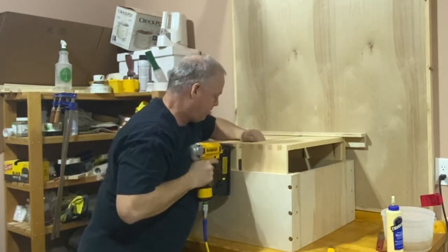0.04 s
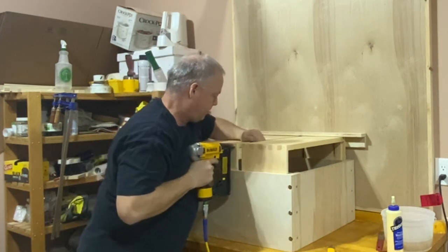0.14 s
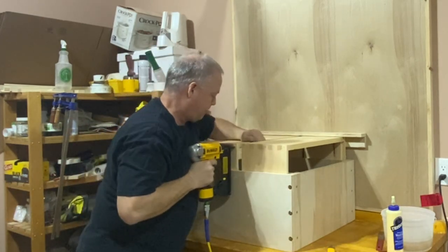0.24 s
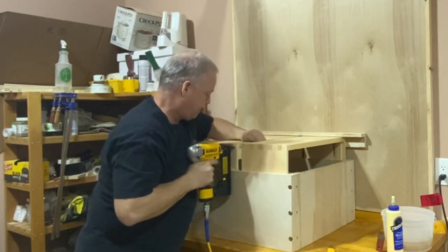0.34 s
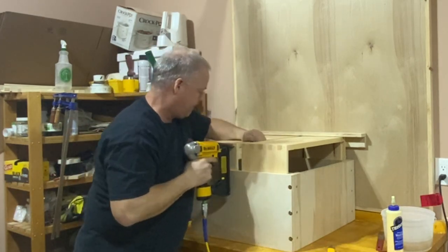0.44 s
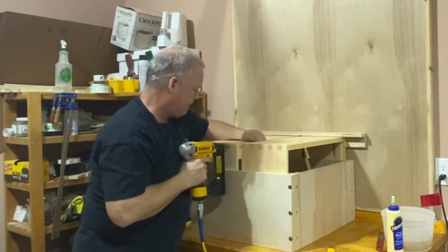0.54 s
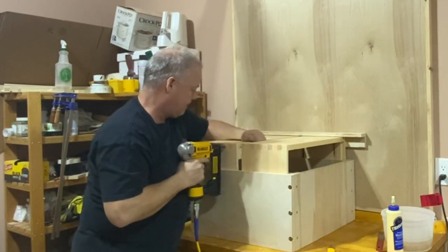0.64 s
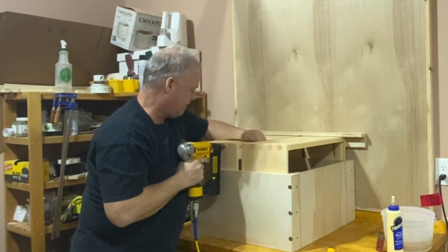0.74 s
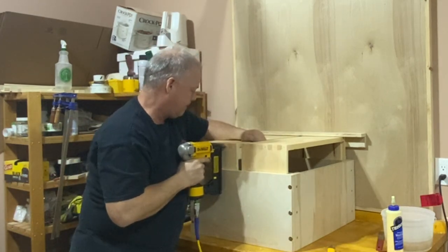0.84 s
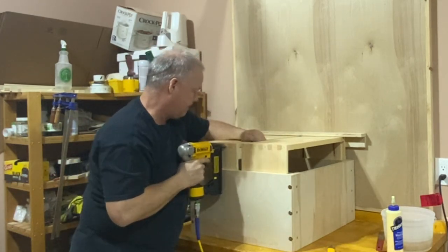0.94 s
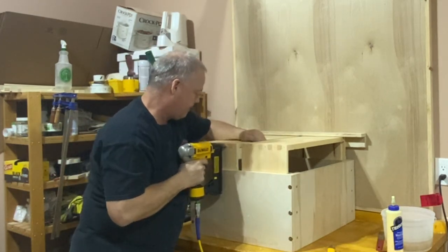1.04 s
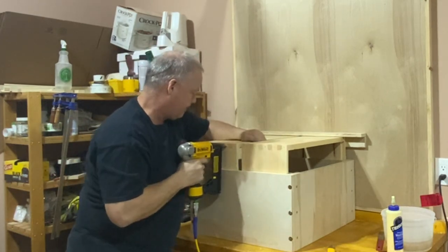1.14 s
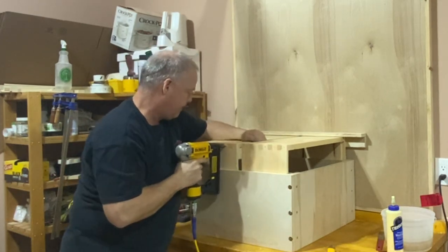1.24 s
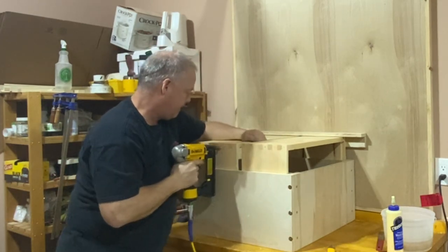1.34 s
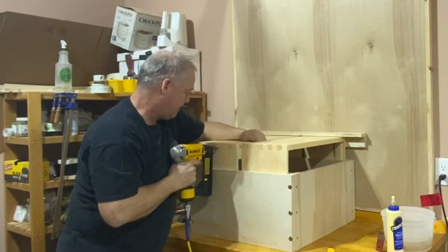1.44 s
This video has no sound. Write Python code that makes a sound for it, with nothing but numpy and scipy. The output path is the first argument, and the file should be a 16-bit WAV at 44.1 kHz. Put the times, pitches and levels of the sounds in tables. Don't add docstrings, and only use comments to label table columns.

```python
import sys
import numpy as np
from scipy import signal
from scipy.fft import rfft, irfft, next_fast_len
from scipy.io import wavfile

SR = 44100
rng = np.random.default_rng(int(sys.argv[2]) if len(sys.argv) > 2 else 0)


def ratio_of_db(decibels):
    return 10 ** (np.asarray(decibels, float) / 20)


def master(y):
    cut = np.clip(np.atleast_2d(y).T, -1, 1)
    pcm = np.round(cut * 32767)
    wavfile.write(sys.argv[1], SR, pcm.astype(np.int16))


N = 66150

# valve_crack_s, crack_db, rattle_db, rattle_length_s
SHOTS = [
    (0.2093, -11.5, -10.5, 0.011),
    (1.0388, -10, -14, .022),
]
# pop_s, pop_db, exhaust_db, thump_db
RETURNS = [
    (0.3148, -4, -20, -25.5),
    (1.1372, -4.5, -18, -21),
]


def rms_one(x):
    return x / np.sqrt(np.mean(x ** 2) + 1e-20)


def at_hz(points, hz):
    table_hz, values = np.array(points).T
    return np.interp(np.log(np.maximum(hz, 1)), np.log(table_hz), values)


def coloured(x, spectrum):
    log_gain = np.log(ratio_of_db(at_hz(spectrum, np.arange(2049) * SR / 4096)))
    cepstrum = irfft(log_gain)
    cepstrum[1:2048] *= 2
    cepstrum[2049:] = 0
    response = irfft(np.exp(rfft(cepstrum)))
    return signal.fftconvolve(x, response / np.sqrt(np.sum(response ** 2)))[:N]


def low_pass(x, order, hz):
    return signal.sosfilt(signal.butter(order, hz, fs=SR, output="sos"), x)


def shape(s, rise, hold, t60):
    t = np.arange(N) / SR - s
    return np.clip(t / rise, 0, 1) * ratio_of_db(-60 * np.clip(t - rise - hold, 0, None) / t60)


def ring(x, hz, t60):
    radius, angle = ratio_of_db(-60 / (t60 * SR)), 2 * np.pi * hz / SR
    return signal.lfilter([0, np.sin(angle)], [1, -2 * radius * np.cos(angle), radius ** 2], x + 1e-18)


def burst(s, db, hz, t60):
    click = np.zeros(N)
    click[int(s * SR)] = 1
    tone = ring(ring(click, hz, t60), hz, t60)
    return ratio_of_db(db) * tone / np.abs(tone).max()


def grains(rate, spread_db):
    sizes = ratio_of_db(spread_db * np.minimum(rng.exponential(1, N), 4)) * rng.choice([-1, 1], N)
    return rms_one(sizes * (rng.random(N) < rate / SR))


def stereo_noise(length, band_gain):
    # band_hz, coherence_0_to_1
    likeness = [(125, .99), (250, .9), (600, 0), (1200, .3), (2300, 0), (4000, .55), (8500, .88),
                (13500, .99)]
    edges_hz = 25 * 2 ** np.arange(0, 9.6, .5)
    white = rng.standard_normal((2, 2, length))
    out = 0
    for k, (low, high) in enumerate(zip(edges_hz, edges_hz[1:])):
        band = signal.butter(2, [low, high], "band", fs=SR, output="sos")
        mid, side = signal.sosfilt(band, white[k % 2])
        hz = np.sqrt(low * high)
        alike = np.clip(at_hz(likeness, hz), 0, 1)
        pair = np.sqrt(1 + alike) * mid + np.sqrt(1 - alike) * side * [[1], [-1]]
        out = out + band_gain(hz) * pair
    return out


def building_hum():
    # band_hz, level_db_per_hz
    floor = [(25, -18), (55, -13), (90, -6.5), (165, -6), (260, -15.5), (630, -19.5), (1500, -31.5),
             (9000, -51)]
    return ratio_of_db(-61) * rms_one(stereo_noise(N, lambda hz: ratio_of_db(at_hz(floor, hz))))


def bench_hum():
    level_db, hz, t60_s = -50, 93.5, 1.1
    t = np.arange(N) / SR
    return ratio_of_db(level_db - 60 * t / t60_s) * np.sin(2 * np.pi * hz * t)


def nose_on_wood():
    # start_s, level_db, length_s, t60_s, dull_above_hz
    touches = [
        (-.003, -49.5, 0.036, .1, 5000),
        (0.932, -55, 0.0065, 0.28, 1800),
        (1.385, -54.5, 0.075, 0.036, 4100),
    ]
    # band_hz, level_db_per_hz
    touch_colour = [(60, -14.5), (150, -4.5), (280, -5.5), (420, 1), (800, -11), (1350, -1.5),
                    (1900, -10.5), (16000, -40.5)]
    rub = coloured(grains(2700, spread_db=3.5), touch_colour)
    return sum(ratio_of_db(db) * shape(s, 0.00068, length, t60) * low_pass(rub, 3, hz)
               for s, db, length, t60, hz in touches)


def trigger_puffs():
    # start_s, level_db, hold_s, t60_s, dull_above_hz
    puff_events = [
        (0.178, -69, .02, .03, 15000),
        (.724, -54, 0.0052, 0.18, 12950),
        (0.777, -56, 0.0085, 0.24, 7500),
        (1.385, -56.5, 0.063, 0.11, 7860),
    ]
    # band_hz, level_db_per_hz
    puff_colour = [(300, -23.5), (1300, -7), (2500, -8.5), (5000, -9.5), (7000, -1.5), (9000, -5.5),
                   (12500, -6.5), (15800, -13)]
    jet = coloured(rng.standard_normal(N), puff_colour)
    return sum(ratio_of_db(db) * shape(s, 0.00051, hold, t60) * low_pass(jet, 2, hz)
               for s, db, hold, t60, hz in puff_events)


def valve_crack():
    # band_hz, level_db_per_hz
    crack_colour = [(150, -15), (400, 1), (1800, -3), (2400, -8), (4000, -24), (6100, -4.5), (9800, -4.5),
                    (14000, -16)]
    level = sum(ratio_of_db(db) * shape(s, 0.0012, .0015, .03) for s, db, _, _ in SHOTS)
    return coloured(level * rng.standard_normal(N), crack_colour)


def leak_and_exhaust():
    # band_hz, level_db_per_hz
    air_colour = [(200, -2), (1200, -1.5), (2100, 4), (3200, -3.5), (6000, -2.5), (9000, 2.5), (13000, -3),
                  (15800, -6)]
    leak_db, leak_rise_s, leak_hold_s, leak_t60_s = -26.5, 0.0044, 0.11, 0.05
    blast_rise_s, blast_hold_s, blast_t60_s = 0.0089, 0.019, 0.17
    leak = sum(ratio_of_db(leak_db) * shape(s, leak_rise_s, leak_hold_s, leak_t60_s) for s, _, _, _ in SHOTS)
    blast = sum(ratio_of_db(db) * shape(s, blast_rise_s, blast_hold_s, blast_t60_s) for s, _, db, _ in RETURNS)
    return coloured((leak + blast) * rng.standard_normal(N), air_colour)


def driver_rattle():
    # mode_hz, level_db, t60_s
    box_modes = [(93, -10, 0.69), (132.45, -2, 0.083), (179, -5.5, 0.54), (219, -8, 0.12),
                 (390, -10, 0.064), (483.2, -3, 0.48), (738, -15.5, 0.31), (1282, -1, 0.28),
                 (1580, -4, 0.07), (1950, -4, 0.087), (2480, -8, .04)]
    # band_hz, level_db_per_hz
    strike_colour = [(60, -16.5), (170, -6), (400, 1.5), (800, -5.5), (1400, -1.5), (2300, 0.0),
                     (3000, -10), (15800, -14.5)]
    delay_s, rise_s, t60_s = 0.0053, 0.0043, .03
    box_db, box_t60_share = -11.5 - 24.5, 0.59
    level = sum(ratio_of_db(db) * shape(s + delay_s, rise_s, length, t60_s) for s, _, db, length in SHOTS)
    rattle = level * grains(4000, spread_db=2.0)
    box = 0
    for k, (hz, db, t60) in enumerate(box_modes):
        sign = (-1) ** k
        box = box + sign * ratio_of_db(db + box_db) * ring(rattle, hz, t60 * box_t60_share)
    return coloured(rattle, strike_colour) + box


def box_rocking():
    # start_s, level_db, pitch_hz, t60_s
    rocks = [
        (0.218, -22, 171.8, .05),
        (0.261, -27, 100.1, 0.035),
        (0.364, -36.5, 88, .06),
        (1.045, -21, 203.5, 0.064),
        (1.054, -13.5, 339, 0.025),
        (1.085, -24, 109.3, 0.061),
        (1.182, -55, 93.5, .06),
    ]
    return sum(burst(*row) for row in rocks)


def pops():
    # pitch_hz, level_db, t60_s
    cap_modes = [(1990, 0.3, .0075), (2300, -9, .006), (5100, -15, .005), (1000, -20, .008)]
    return sum(burst(s, db + mode_db, hz, t60)
               for s, db, _, _ in RETURNS for hz, mode_db, t60 in cap_modes)


def piston_thumps():
    hz, t60_s = 246.6, 0.03
    return sum(burst(s + 0.0063, db - 0.5, hz * 1.05, t60_s) + burst(s + 0.053, db, hz, t60_s)
               for s, _, _, db in RETURNS)


def bumps_and_ticks():
    # start_s, level_db, pitch_hz, t60_s
    bumps = [
        (.385, -36, 365.5, 0.051),
        (0.743, -50.5, 191.8, .04),
        (0.812, -53, 197.4, .04),
        (0.954, -37.5, 157, 0.047),
        (0.979, -44.5, 192, 0.043),
        (1.411, -43, 326, 0.04),
        (1.448, -45, 333.4, 0.048),
    ]
    # start_s, level_db, pitch_hz, t60_s
    ticks = [
        (.725, -57, 7000, .008),
        (.727, -60, 12800, .008),
        (.778, -62, 5100, .008),
        (.778, -60, 6600, .006),
    ]
    return sum(burst(*row) for row in bumps + ticks)


def workshop(x):
    # band_hz, t60_s
    room_t60 = [(60, 0.17), (250, 0.41), (1000, 0.56), (2200, 0.43), (5000, 0.42), (9000, 0.27),
                (14000, 0.42)]
    late_db, late_start_s, late_rise_s = -8.5, 0.012, 0.018
    scatter_db, scatter_t60_s = -3, .05
    scatter_t60 = [(100, 1.35 * scatter_t60_s), (2000, scatter_t60_s)]
    length = SR // 2
    t = np.arange(length) / SR
    late = stereo_noise(length, lambda hz: ratio_of_db(-60 * t / at_hz(room_t60, hz)))
    late = late * np.clip((t - late_start_s) / late_rise_s, 0, 1)
    early = stereo_noise(length, lambda hz: ratio_of_db(-60 * t / at_hz(scatter_t60, hz)))
    early = early * np.clip((t - .001) / 0.006, 0, 1)
    echo = sum(ratio_of_db(db) * h / np.sqrt(np.sum(h ** 2) / 2) for db, h in [(late_db, late), (scatter_db, early)])
    return signal.fftconvolve(x[None], echo, axes=1)[:, :N]


def scene():
    near = bench_hum() + nose_on_wood() + trigger_puffs() + valve_crack() + leak_and_exhaust()
    near = near + driver_rattle() + box_rocking() + piston_thumps() + bumps_and_ticks()
    pop = pops()
    to_walls = near + ratio_of_db(-5) * pop
    return near + pop + workshop(to_walls) + building_hum()


def roll_off(x):
    return signal.sosfilt(signal.butter(12, 16810, fs=SR, output="sos"), x)


def record(dry):
    # band_hz, phase_rad
    port_phase = [(150, 0), (700, 1.1), (2200, -1.4), (4000, -.2), (7500, -1.6), (9300, -2.9),
                  (11000, -3.4), (13600, -6.28)]
    # band_hz, level_db
    balance = [(100, 0), (300, -1), (600, 2.2), (1200, -1), (2200, 3.8), (5000, -1.3), (10000, 0)]
    ceiling = 1.6
    size = next_fast_len(N + 4096)
    hz = np.arange(size // 2 + 1) * SR / size
    tilt = ratio_of_db(at_hz(balance, hz) / 2) * np.exp(.5j * at_hz(port_phase, hz))
    x = irfft(rfft(dry, size) * np.array([tilt, 1 / tilt]), size)[:, :N]
    x = ceiling * np.tanh(x / ceiling)
    x = signal.sosfilt(signal.butter(2, 60, "high", fs=SR, output="sos"), x)
    mix = signal.sosfilt(signal.cheby2(12, 35, 16000, fs=SR, output="sos"), x)
    return roll_off(mix)


dry = scene()
out = record(dry)
master(out)
```